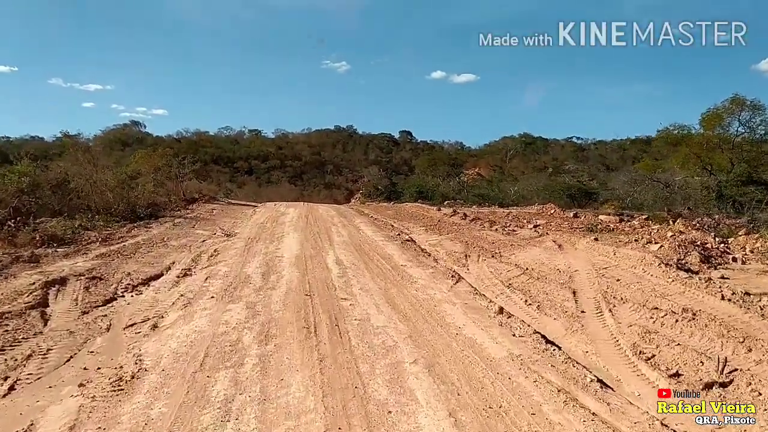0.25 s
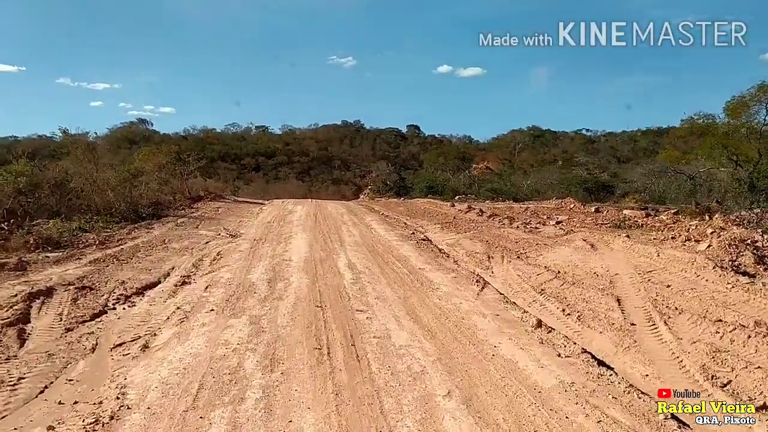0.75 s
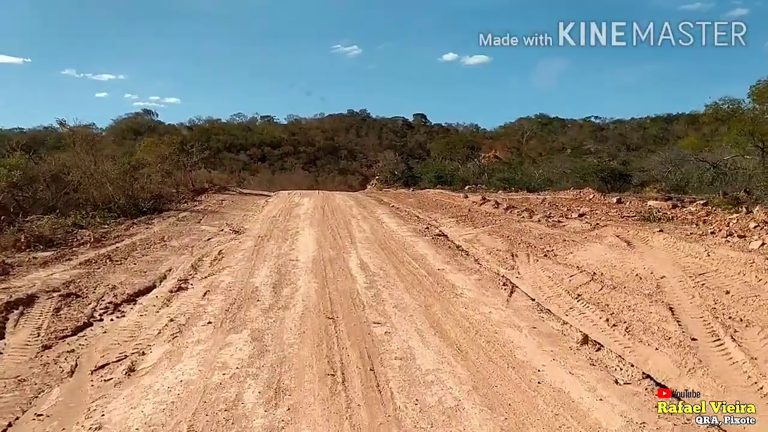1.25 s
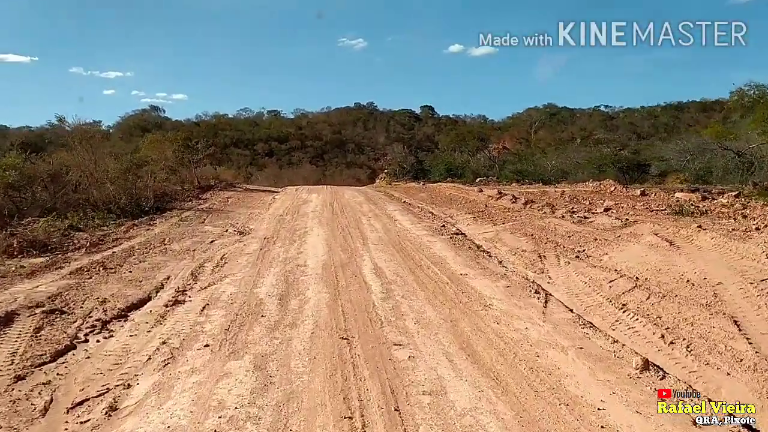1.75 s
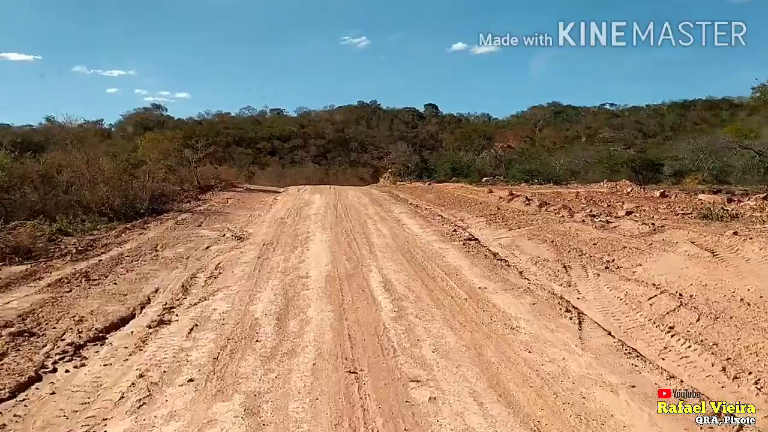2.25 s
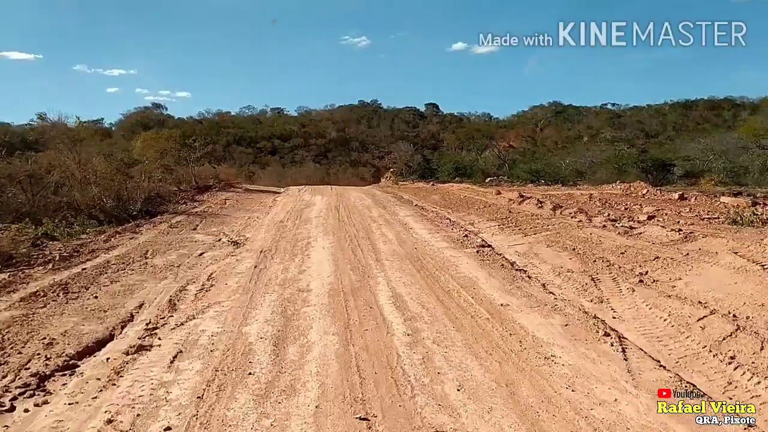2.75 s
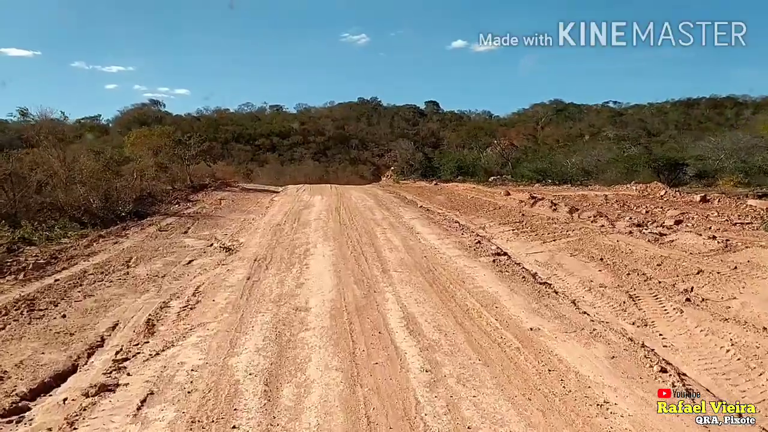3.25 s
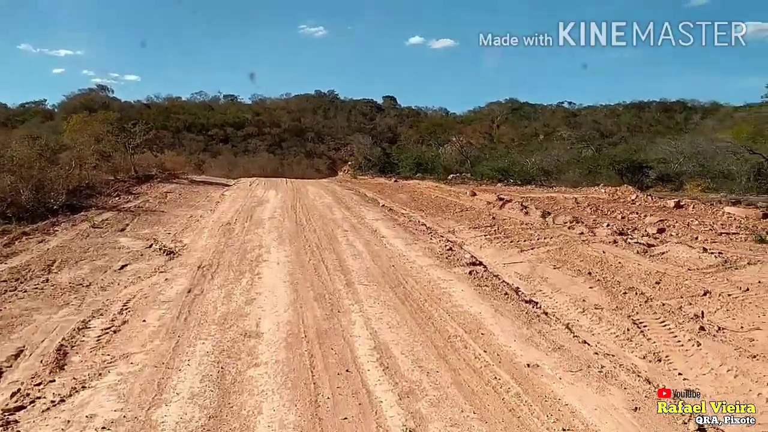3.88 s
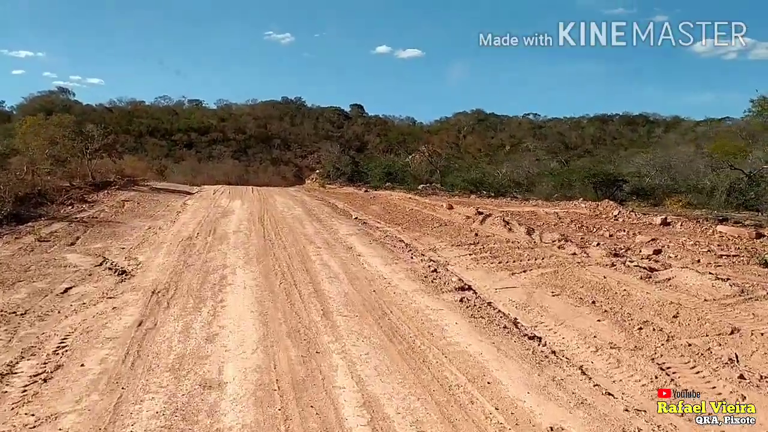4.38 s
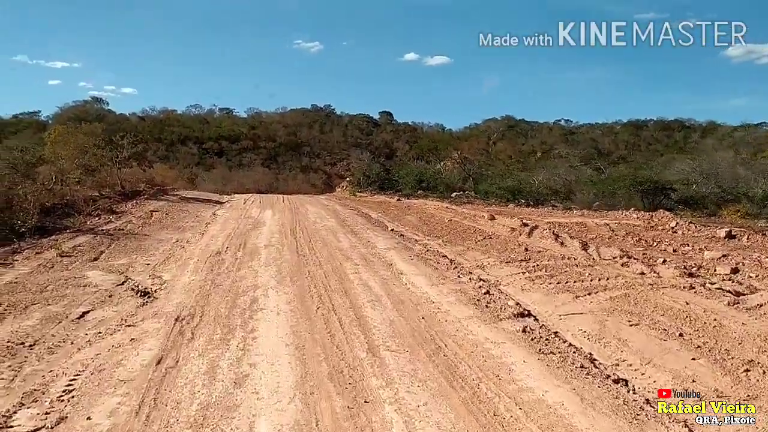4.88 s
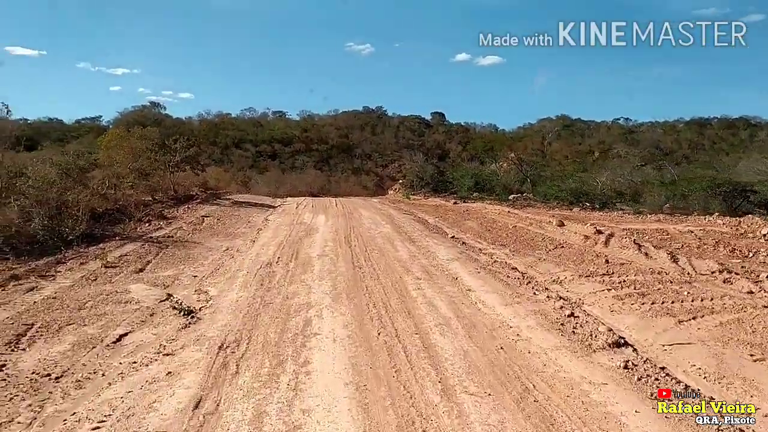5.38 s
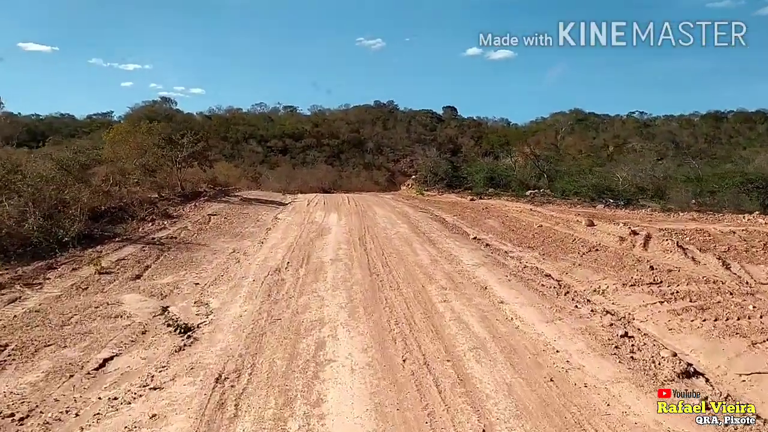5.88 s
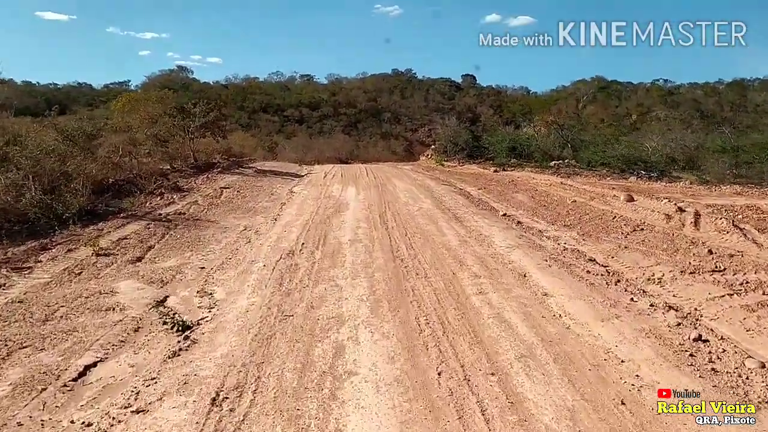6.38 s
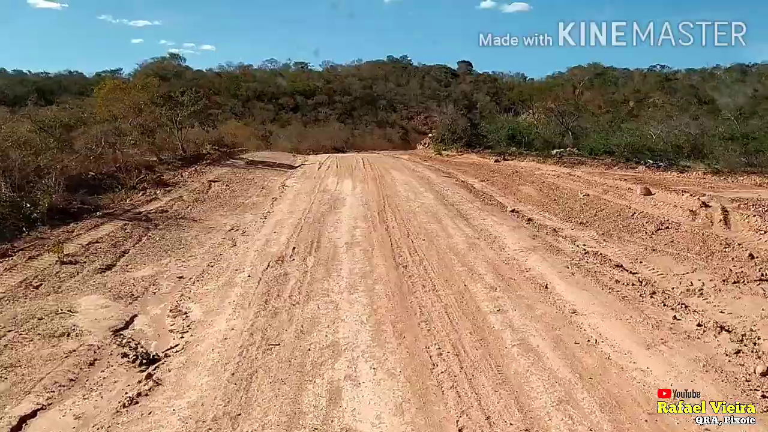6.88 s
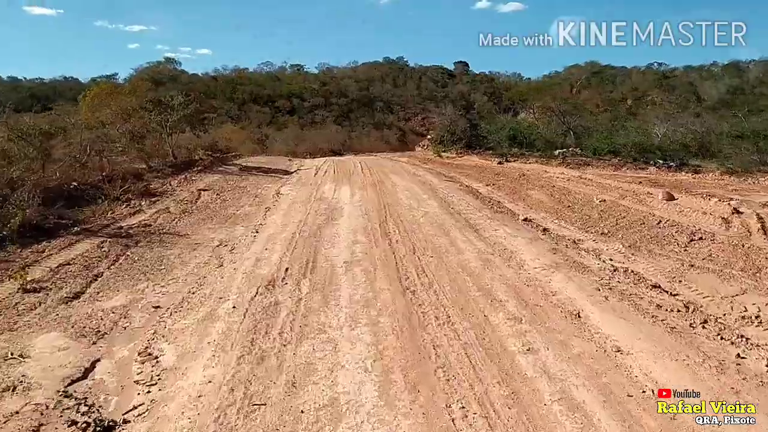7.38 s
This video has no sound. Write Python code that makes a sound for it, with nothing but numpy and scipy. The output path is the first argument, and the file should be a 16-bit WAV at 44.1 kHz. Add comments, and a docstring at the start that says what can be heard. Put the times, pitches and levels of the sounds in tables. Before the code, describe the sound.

A diesel truck drones and rumbles from inside the cab, with trim snapping and a high rasping squeal near the end.

```python
"""A diesel drone and road rumble, heard from inside the cab of a truck crawling along a rough dirt road.
Six cylinders boom under a thin blower tone; close by, trim snaps and creaks, the floor knocks and a
timer ticks each second. Near the end air leaks from a valve on the left, whose seal flutters into a
rasping squeal. Snaps and squeal reach the two microphones with the cab's short echo."""
import sys
import numpy as np
from scipy import signal
from scipy.fft import rfft, irfft, next_fast_len
from scipy.io import wavfile
from scipy.ndimage import uniform_filter1d

SR = 44100
rng = np.random.default_rng(int(sys.argv[2]) if len(sys.argv) > 2 else 0)


def int16_out(signal):
    """Quantize to a 16-bit WAV file."""
    q = np.round(np.clip(np.atleast_2d(signal).T, -1, 1) * 32767)
    wavfile.write(sys.argv[1], SR, q.astype(np.int16))


N = 336483

# Engine speed. Each row: time in seconds, firings per second.
FIRING_RATE = [(0, 58.8), (.55, 58.8), (1.0, 57.3), (1.45, 55.8), (2.7, 55.6), (3.3, 56), (4.0, 57),
               (4.6, 57.8), (5.3, 59.2), (6.2, 59.5), (6.9, 58.4), (7.63, 58)]


def gain_of(db):
    """Decibels to amplitude."""
    return 10 ** (np.asarray(db) / 20)


def unit_rms(x):
    """Scales to rms 1."""
    return x / np.sqrt(np.mean(x ** 2) + 1e-20)


def spectrum_at(points, hz):
    """Reads a spectrum on a log-frequency axis."""
    point_hz, value = np.transpose(points)
    return np.interp(np.log(hz + 1), np.log(point_hz + 1), value)


def curves(rows, t):
    """Joins timed rows by straight lines: one curve for each column after the time."""
    times, *values = np.transpose(rows)
    return [np.interp(t, times, v) for v in values]


def add(mix, start_s, sound):
    """Mixes a stereo sound in at start_s."""
    part = mix[:, round(start_s * SR):][:, :sound.shape[1]]
    part += sound[:, :part.shape[1]]


def wander(length, hz):
    """Random drift of rms 1 with changes up to hz."""
    steps = rng.standard_normal(int(length * 2 * hz / SR) + 3)
    smooth = np.interp(np.arange(length) * 2 * hz / SR, np.arange(len(steps)), steps)
    return unit_rms(uniform_filter1d(smooth, max(int(SR / hz / 2), 1)))


def coloured(x, points):
    """Filters the last axis by a spectrum of (Hz, dB) points."""
    size = next_fast_len(x.shape[-1])
    response = gain_of(spectrum_at(points, np.fft.rfftfreq(size, 1 / SR)))
    return irfft(rfft(x, size) * response, size)[..., :x.shape[-1]]


def panned(x, db):
    """Places a sound db louder at the left microphone than at the right."""
    return np.array([x * gain_of(db / 2), x * gain_of(-db / 2)])


def cab_noise(colour, patchy_db):
    """Noise with drifting patches; its bass is alike at both microphones."""
    # Likeness of left and right. Each row: frequency in Hz, correlation.
    correlation = [(60, 0.98), (130, 1), (290, 0.63), (640, 0.8), (1400, -0.29), (3100, 0.026),
                   (7000, -0.0024)]
    frames, hz = N // 512 + 5, np.fft.rfftfreq(2048, 1 / SR)
    left_re, left_im, other_re, other_im, patches = rng.standard_normal((frames, 1025, 5)).T
    patches = unit_rms(uniform_filter1d(uniform_filter1d(patches, 16, 0), 6, 1))
    alike = np.clip(spectrum_at(correlation, hz), -1, 1)[:, None]
    left = left_re + 1j * left_im
    right = alike * left + np.sqrt(1 - alike ** 2) * (other_re + 1j * other_im)
    spectra = np.array([left, right]) * gain_of(spectrum_at(colour, hz)[:, None] + patchy_db * patches)
    return unit_rms(signal.istft(spectra, nperseg=2048, noverlap=1536)[1][:, :N])


def cab_echo(x, t60):
    """A small damped space: random reflections, different at each microphone."""
    taps = rng.choice([-1., 1.], (2, 4000)) * (rng.random((2, 4000)) < .2)
    taps *= gain_of(-60 * np.arange(4000) / SR / t60)
    taps[:, :40] = 0
    return signal.oaconvolve(x, taps / np.linalg.norm(taps[0]), axes=1)[:, :x.shape[1]]


def road_rumble():
    """Rumble all around; it throbs because every second firing shakes the cab harder."""
    # Road and cab noise. Each row: frequency in Hz, relative density in dB.
    colour = [(14, -1.5), (35, -11), (45, -17), (70, -8), (130, -6), (180, -7), (215, -13), (420, -16),
              (560, -18.5), (1000, -26.5), (2300, -32.5), (3200, -42.5), (6500, -48), (12200, -58),
              (13000, -70), (16000, -90)]
    # Balance of the rumble. Each row: frequency in Hz, left over right in dB.
    balance = [(60, 1), (110, -2.5), (200, 0.5), (380, -0.5), (700, 0.5), (2000, 3)]
    firing_hz, = curves(FIRING_RATE, np.arange(N) / SR)
    throb_db = np.sin(np.pi * np.cumsum(firing_hz) / SR)
    rumble = gain_of(-33 + throb_db) * cab_noise(colour, patchy_db=1.64)
    rumble[0] = coloured(rumble[0], balance)
    return rumble


def blower():
    """A blade tone that wavers a little, centred, with thin whines on the left."""
    # Blade tone. Each row: time in seconds, pitch in Hz.
    blade_pitch = [(0, 486.8), (1.4, 487.7), (5.8, 490.6), (7.63, 489.2)]
    # Faint steady whines. Each row: pitch in Hz, relative level in dB.
    whines = [(1421, -55.5), (2250, -60.5)]
    t = np.arange(N) / SR
    blade_hz, = curves(blade_pitch, t)
    phase = 2 * np.pi * np.cumsum(blade_hz) / SR
    tone = gain_of(-43.5 + .8 * wander(N, 8)) * np.sin(phase + .15 * wander(N, 6))
    whine = sum(gain_of(db + 1.5 * wander(N, 3)) * np.sin(2 * np.pi * hz * t + .4 * wander(N, 5))
                for hz, db in whines)
    return np.sqrt(2) * np.array([tone + 1.47 * whine, tone + .028 * whine])


def engine():
    """Six firings per cycle boom in the cab; uneven cylinders add weaker orders that waver."""
    # Boom of the firings. Each row: time in seconds, relative level in dB.
    boom = [(0, -32), (.5, -32.5), (.8, -32.5), (1.14, -33.5), (1.5, -31), (2.7, -31), (3.2, -28.5),
            (3.5, -31), (4.6, -29.5), (5.0, -35.5), (5.3, -32), (5.93, -34.5), (6.1, -41), (6.75, -44),
            (7.0, -33.5), (7.63, -34)]
    # Weaker orders. Each row: multiple of the four-stroke cycle, relative level in dB.
    orders = [(3, -46.5), (7, -52.5), (9, -41), (12, -40.5), (13, -47), (14, -43), (15, -40.5), (17, -44),
              (18, -40.5), (20, -49.5), (26, -49)]
    t = np.arange(N) / SR
    firing_hz, = curves(FIRING_RATE, t)
    boom_db, = curves(boom, t)
    shake_db = -37.5 + 3.5 * wander(N, 2.7)
    cycle = 2 * np.pi * np.cumsum(firing_hz) / SR / 6
    lag = np.array([[0.], [.2]])  # radians between the microphones
    out = gain_of(boom_db + 1.5 * wander(N, 12)) * np.sin(6 * cycle + lag)
    # the crankshaft shakes the cab once a turn, now more, now less
    out += gain_of(shake_db) * np.sin(2 * cycle + .5 * wander(N, 3.6) + lag)
    for order, db in orders:
        level = gain_of(db + 2.56 * wander(N, 3))
        out += level * np.sin(order * cycle + .34 * wander(N, 4) + 7 * rng.random() + lag)
    return np.sqrt(2) * panned(.84, np.array([.1])) * out


def timer_ticks():
    """Off to the left, a tiny pawl rings high once a second and bounces unevenly three times."""
    # Each entry: relative level of one tick in dB.
    tick_levels = [-40.5, -35, -39.5, -40.5, -42, -45]
    first_s, ring_hz = .3885, 10600
    out, t = np.zeros((2, N)), np.arange(400) / SR
    envelope = np.minimum(t / .0013, 1) * gain_of(-60 * t / .012)
    for second, db in enumerate(tick_levels):
        for bounce, (detune, late, force) in enumerate(rng.standard_normal((4, 3))):
            ring = np.sin(2 * np.pi * ring_hz * (1 + .021 * detune) * t) * envelope
            level = gain_of(db + 3.5 - .54 * bounce ** 2 + 1.5 * force)
            start = first_s + second + bounce * (.0043 + .0003 * late)
            add(out, start, panned(ring * level, db=12))
    return out


def creak():
    """One short creak near the centre: a rising chirp with its octave."""
    # Course of the creak. Each row: time in seconds, relative level in dB, pitch in Hz.
    course = [(.62, -49, 1005), (.656, -45, 1030), (.67, -54, 1110)]
    t = np.arange(course[0][0], course[-1][0], 1 / SR)
    db, hz = curves(course, t)
    phase = 2 * np.pi * np.cumsum(hz) / SR
    chirp = 1.3 * np.sin(phase) + .68 * np.sin(2 * phase)
    fade = np.clip(np.minimum(t - t[0], t[-1] - t) / .003, 0, 1)
    out = np.zeros((2, N))
    add(out, t[0], panned(fade * gain_of(db) * chirp, db=1.5))
    return out


def floor_knocks():
    """Each dull knock underfoot rings five close modes of a damped floor panel."""
    # Each row: start in seconds, relative level in dB, strongest mode in Hz.
    knocks = [(0.575, -22.5, 431), (0.655, -26, 478), (.668, -30, 464), (0.784, -26, 732), (.791, -26, 693),
              (0.809, -29, 424), (0.829, -30, 470), (1.657, -29, 1263), (1.66, -37, 713),
              (1.672, -22.5, 536), (5.677, -22, 736), (5.687, -29, 856), (5.699, -29, 670),
              (5.714, -24.5, 623), (5.727, -35, 710)]
    out, t = np.zeros((2, N)), np.arange(4000) / SR
    envelope = np.minimum(t / .002, 1) * gain_of(-60 * t / .078)
    for start, db, hz in knocks:
        ring = sum(gain_of(mode_db) * np.sin(2 * np.pi * (hz * ratio * t + rng.random()))
                   for ratio, mode_db in ((.62, 0), (.8, -1), (1, 4.5), (1.3, -4), (1.65, -7)))
        add(out, start, panned(ring * envelope * gain_of(db - 7.5), db=0))
    return out


def trim_snaps():
    """Trim and grit crack close by, left of centre: a sharp top, then a body that lasts longer."""
    # Each row: start in seconds, relative level in dB, body over top in dB, body centre in Hz,
    # relative level of the highest treble in dB, t60 of the top's fast decay in seconds.
    snaps = [(0.2538, -40.5, 1, 1500, -18, 0.051), (1.1774, -40.5, -13.5, 1500, -13, .03),
             (1.65, -31, -20, 1500, -2, .04), (1.655, -23.5, 4.5, 1280, -14.5, 0.045),
             (1.7371, -35, -14, 1500, -7, 0.029), (1.7712, -25.5, -4, 2200, -17.5, 0.01),
             (2.241, -35, -24, 1500, -10, .025), (2.7549, -25.5, -7, 2600, -12, 0.021),
             (3.2665, -38.5, -13, 1500, -17, .03), (4.4115, -40.5, -1, 1500, -15, 0.083),
             (4.78, -29.5, -17, 1500, -9.5, 0.03), (5.0875, -38, -16, 1500, -7, .03),
             (5.314, -33.5, -5, 1499, -16, 0.029), (5.5279, -41.5, 4, 1500, -20, 0.031),
             (5.5777, -42, -12, 1500, -9, 0.049), (5.6695, -37, 8, 2320, -6, 0.032),
             (5.712, -46, 9, 2307, -14, .02), (5.744, -27, 3, 1490, -12, 0.034),
             (5.9873, -30.5, 3, 1960, 2, 0.053), (6.184, -22, -12, 1490, 4, 0.016),
             (6.239, -27, -15, 1510, -3, 0.089), (6.386, -21, -20, 1500, -3, 0.024)]
    rise_s = .0017
    out, t = np.zeros((2, N)), np.arange(6000) / SR
    decay_t = np.maximum(t - rise_s, 0)
    for start, db, body_db, body_hz, treble_db, t60 in snaps:
        top_colour = [(1000, -26), (1700, -11), (2800, 1.5), (4500, -3.5), (7000, -4),
                      (9000, treble_db + 12.5), (11500, treble_db + 11),
                      (13000, treble_db - 10), (16000, treble_db - 9)]
        body_colour = [(.18 * body_hz, -24), (.51 * body_hz, -12), (.87 * body_hz, -1.5),
                       (1.36 * body_hz, -4), (2.53 * body_hz, -18.5), (16000, -55)]
        top_noise, body_noise = rng.standard_normal((2, 2, len(t)))
        top = unit_rms(coloured(top_noise, top_colour)) * np.minimum(t / rise_s, 1)
        top *= gain_of(-60 * decay_t / t60) + .16 * gain_of(-20 * decay_t / t60)
        body = unit_rms(coloured(body_noise, body_colour)) * np.minimum(t / (2 * rise_s), 1)
        body *= gain_of(body_db - 35 * decay_t / t60)
        add(out, start - .001, (top + body) * panned(np.ones(1), db=4.5) * gain_of(db - 4))
    return out


def air_leak():
    """Air hisses through the valve seal, mostly in the treble, faint until near the end."""
    # Swell of the hiss. Each row: time in seconds, relative level in dB.
    swell = [(0, -55.5), (2.4, -56), (3.7, -57), (4.2, -55.5), (4.45, -50.5), (5.0, -53.5), (5.66, -57.5),
             (5.79, -39), (6.6, -40), (6.66, -37), (6.95, -43), (7.4, -44), (7.5, -35.5), (7.63, -36.5)]
    # Colour of the hiss. Each row: frequency in Hz, relative density in dB.
    colour = [(2500, 0), (4000, -9), (7400, -7.5), (9100, 0.5), (10000, 1), (10900, 2), (12200, -8.5),
              (12700, -17), (14500, -20), (16000, -27)]
    level_db, = curves(swell, np.arange(N) / SR)
    return gain_of(level_db + 3) * cab_noise(colour, patchy_db=1.4)


def seal_bursts(t, voice, longest_rise_s=np.inf):
    """Amplitude of one voice of the seal: each burst rises, holds and falls."""
    # Each row: start of the hold in seconds, its length in seconds, rise and fall in seconds per 20 dB,
    # then relative levels in dB of the high flutter, the low flutter and the rasp.
    bursts = [(6.068, 0.042, 0.034, .025, -28.5, -80, -79), (6.178, .008, 0.014, .01, -32.5, -83, -80),
              (6.198, 0.024, 0.0059, 0.017, -20.5, -80, -39),
              (6.248, 0.0076, 0.011, 0.018, -31, -80, -35.5), (6.279, 0.009, .015, 0.048, -38.5, -82, -46),
              (6.378, 0.046, 0.035, 0.027, -35, -80, -80), (6.545, 0.0045, 0.062, .02, -44, -82, -82),
              (6.574, .02, 0.014, 0.018, -36, -80, -39), (6.614, .02, .015, .03, -36, -82, -60),
              (6.666, 0.04, 0.052, 0.022, -26, -49, -25), (6.732, 0.015, 0.0051, 0.035, -26.5, -32, -23.5),
              (6.828, 0.042, 0.084, 0.045, -23, -43, -22.5), (6.918, 0.0015, 0.0036, 0.0038, -23, -26, -36),
              (6.952, 0.1, 0.024, 0.015, -24.5, -24, -22), (7.08, 0.063, 0.0081, 0.049, -26.5, -21.5, -22),
              (7.172, 0.078, .04, 0.11, -35, -26, -23.5), (7.279, 0.15, 0.05, 0.068, -27, -27.5, -22),
              (7.363, 0.036, 0.055, 0.033, -26.5, -16, -21.5), (7.405, 0.044, 0.073, 0.078, -21, -60, -24),
              (7.484, 0.096, 0.02, 0.11, -22, -83, -26), (7.553, 0.071, 0.13, 0.022, -21.5, -40, -22.5)]
    column = ("high", "low", "rasp").index(voice)
    out = np.zeros(len(t))
    for start, hold, rise, fall, *levels_db in bursts:
        away = np.maximum((start - t) / min(rise, longest_rise_s), (t - start - hold) / fall)
        out = np.maximum(out, gain_of(levels_db[column] - 20 * np.clip(away, 0, 9)))
    return out


def seal_flutter(hz, scatter, level, pan_db, tone_drift):
    """The seal slaps open and shut: returns its steadier tone and the uneven phase of the slaps."""
    drift = scatter * wander(len(level), 300)
    slap_phase = 2 * np.pi * np.cumsum(hz * (1 + drift)) / SR
    tone_phase = 2 * np.pi * np.cumsum(hz * (1 + tone_drift * drift)) / SR
    # reflections make the tone stutter differently at each microphone
    paths = np.array([wander(len(level), 60) for _ in range(4)])
    mic_phase = tone_phase + 16.7 * scatter * paths[:2]
    stutter_db = scatter * (33 * paths[2:] + 55 * wander(len(level), 200))
    tone = np.sin(mic_phase) + level * gain_of(-7) * np.sin(2 * mic_phase)
    return np.sqrt(2) * tone * gain_of(stutter_db) * panned(level, pan_db), slap_phase


def partials(phases):
    """Overtones that flicker each on its own, differently at each microphone."""
    return unit_rms(sum(np.cos(phase) * gain_of([3.75 * wander(len(phase), 60) for _ in range(2)])
                        for phase in phases))


def streaked(x, streak_db):
    """Narrow bands swell and fade each on their own, in streaks."""
    spectra = signal.stft(x, nperseg=512)[2]
    streaks = uniform_filter1d(rng.standard_normal(spectra.shape[1:]), size=2, axis=0)
    streaks = unit_rms(uniform_filter1d(streaks, size=8, axis=1))
    return unit_rms(signal.istft(spectra * gain_of(streak_db * streaks), nperseg=512)[1][:, :x.shape[1]])


def seal_rasp(high_phase, low_phase, low_share, scatter):
    """Overtones and sum tones of the two flutters, with a spray that grows as the slaps turn uneven."""
    # Broadband spray. Each row: frequency in Hz, relative density in dB.
    spray_colour = [(1000, -25.5), (1500, -3), (1900, 3.5), (2300, -10), (2750, -17), (3300, -14.5),
                    (4100, -4), (4550, -20), (5200, -18), (6350, -9), (7500, -7.5), (9100, -6.5),
                    (11000, -11.5), (12200, -34), (14500, -28), (16000, -36)]
    # Colour of the overtones. Each row: frequency in Hz, relative gain in dB.
    overtone_colour = [(1000, -7), (2800, -6), (3400, -4.5), (4000, -6), (4550, 2.5), (5100, -11.5),
                       (5800, -10.5), (6350, -7), (7400, -6), (9100, 3), (10000, -1), (10900, -1.5),
                       (12200, -15.5), (12700, -22), (15000, -21), (16000, -45)]
    # Three narrow dips and a few bright peaks shape the rasp. Each row: frequency in Hz, gain in dB.
    rasp_dips_and_peaks = [(4200, 0), (4450, -26), (4650, -26), (4950, 2), (6000, 2), (6250, -26),
                           (6450, -26), (6700, 0), (7750, 0), (8050, -18), (8400, -1), (8900, 0), (9200, 4),
                           (9550, 0), (10600, 0), (11000, 3), (11400, 0)]
    spray = streaked(coloured(rng.standard_normal((2, len(scatter))), spray_colour), streak_db=3.5)
    sum_tones = partials(a * high_phase + b * low_phase for a in range(1, 5) for b in range(1, 3))
    slaps = (1 - .86 * low_share) * partials(k * high_phase for k in range(2, 9))
    slaps += .88 * low_share * partials(k * low_phase for k in range(2, 9))
    slaps += .84 * np.sqrt(low_share * (1 - low_share)) * sum_tones
    rasp = unit_rms(coloured(slaps, overtone_colour)) + (25 * scatter) ** 2 * spray
    flicker = gain_of(2 * wander(len(scatter), 150))
    return coloured(rasp * flicker, rasp_dips_and_peaks)


def valve_squeal():
    """Close on the left, the seal squeals with two flutters and their shared rasp, echoing in the cab."""
    # Main flutter. Each row: time in seconds, pitch in Hz, scatter as a share of pitch,
    # left over right in dB.
    high_flutter = [(6.04, 2204, 0.0098, 14), (6.095, 2127, .012, 15), (6.125, 2280, 0.0164, 12),
                    (6.17, 2233, 0.014, 14), (6.192, 2243, 0.018, 8), (6.2, 2104, 0.018, 10.5),
                    (6.26, 2055, 0.0176, 9), (6.3, 2110, 0.0188, 9), (6.37, 2153, 0.018, 8.5),
                    (6.44, 2110, 0.0178, 18), (6.55, 2090, 0.0168, 14), (6.59, 2040, 0.022, 7),
                    (6.625, 2155, 0.021, 17.5), (6.68, 2005, 0.03, 7.5), (6.79, 2063, 0.0273, 5),
                    (6.84, 1938, 0.028, 11), (6.91, 2031, 0.0305, 9), (6.952, 1881, 0.035, 10),
                    (6.985, 1968, 0.0346, 3), (7.005, 1900, 0.0372, 6), (7.055, 1977, 0.0362, 5),
                    (7.085, 1866, 0.0364, 11), (7.135, 1956, 0.0337, 5), (7.21, 1877, 0.0417, 3),
                    (7.32, 1863, 0.0345, 2), (7.345, 1973, 0.027, 5), (7.39, 1954, 0.037, 16),
                    (7.44, 1956, 0.011, 11.5), (7.51, 2002, 0.013, 5.5), (7.57, 1871, .0105, 13.5),
                    (7.6, 1867, 0.009, 10.5), (7.63, 1810, 0.012, 2)]
    # A lower flutter joins at full pressure. Each row: time in seconds, pitch in Hz,
    # left over right in dB.
    low_flutter = [(6.7, 1760, 4), (6.77, 1790, 9), (6.86, 1600, 11), (6.92, 1720, 7), (6.96, 1630, -0.5),
                   (7.03, 1658, 8), (7.08, 1634, 1), (7.15, 1676, 4), (7.19, 1636, 9), (7.23, 1665, 13),
                   (7.27, 1600, 1), (7.33, 1627, -4), (7.39, 1645, -5), (7.42, 1655, 8)]
    t = np.arange(6 * SR, N) / SR
    high_hz, scatter, high_pan_db = curves(high_flutter, t)
    low_hz, low_pan_db = curves(low_flutter, t)
    high_level, low_level = seal_bursts(t, "high"), seal_bursts(t, "low")
    rasp_level = gain_of(-.92) * seal_bursts(t, "rasp", longest_rise_s=.023)
    high_tone, high_phase = seal_flutter(high_hz, scatter, high_level, high_pan_db, tone_drift=.42)
    low_tone, low_phase = seal_flutter(low_hz, scatter, low_level, low_pan_db, tone_drift=.17)
    tones = gain_of(3) * (high_tone + low_tone)
    low_share = low_level / (low_level + high_level)
    rasp = seal_rasp(high_phase, low_phase, low_share, scatter) * panned(rasp_level, db=3.2)
    for sound in (tones, rasp):
        sound[0] = np.roll(sound[0], 11)  # the left microphone hears it a little later
    echo = cab_echo(gain_of(-6) * tones, t60=.08) + cab_echo(gain_of(2.5) * rasp, t60=.048)
    out = np.zeros((2, N))
    add(out, t[0], tones + rasp + echo)
    return out


def scene():
    """Rumble and drone fill the cab behind the close sounds; snaps and squeal echo in it."""
    snaps = trim_snaps()
    background = road_rumble() + engine() + blower()
    close = air_leak() + floor_knocks() + creak() + timer_ticks() + valve_squeal() + snaps
    return background + close + cab_echo(gain_of(-.5) * snaps, t60=.049)


def record(dry):
    """The loudest peaks are rounded off, then the highest treble is cut."""
    drive, cutoff_hz = 1.05, 15900
    rounded = np.tanh(dry * drive) / drive
    lowpass = signal.firwin(511, cutoff_hz, window=("kaiser", 9), fs=SR)
    return signal.oaconvolve(rounded, lowpass[None], "same")


dry = scene()
out = record(dry)
int16_out(out)
```